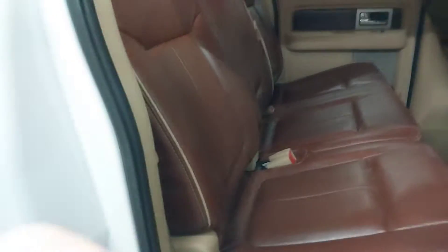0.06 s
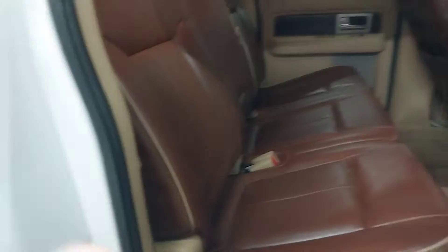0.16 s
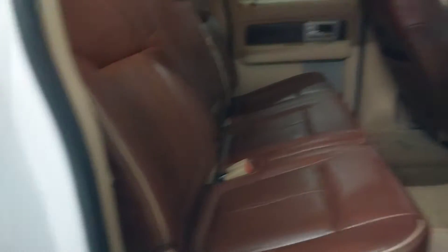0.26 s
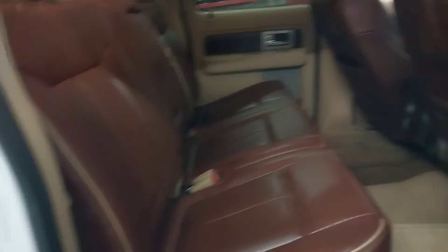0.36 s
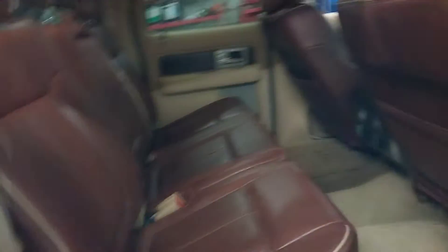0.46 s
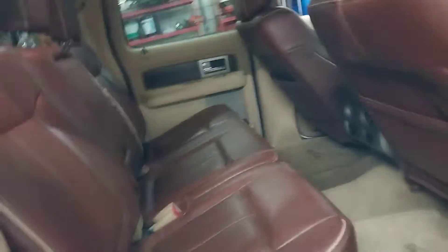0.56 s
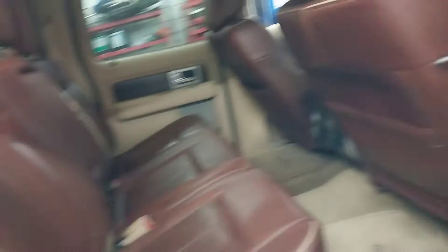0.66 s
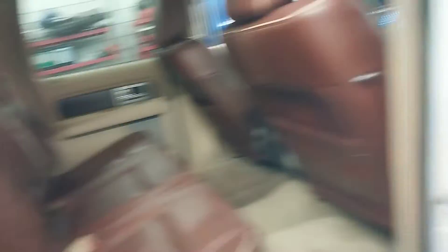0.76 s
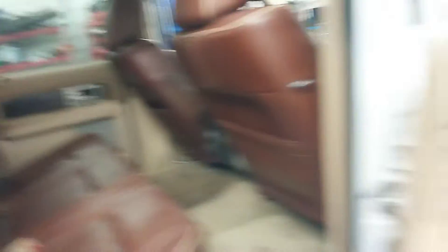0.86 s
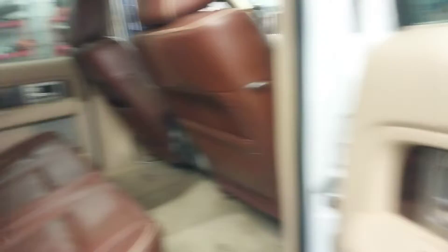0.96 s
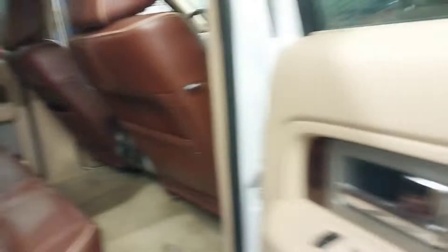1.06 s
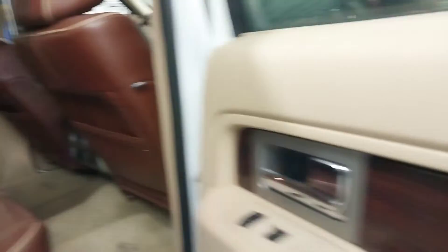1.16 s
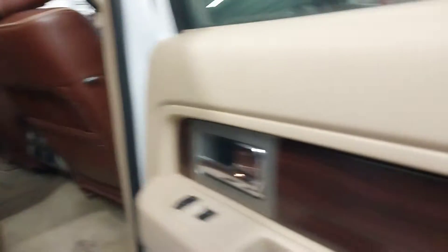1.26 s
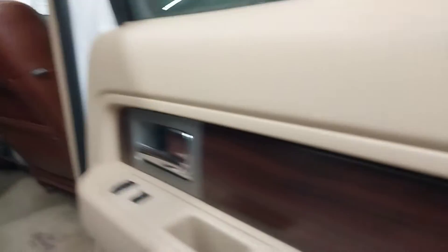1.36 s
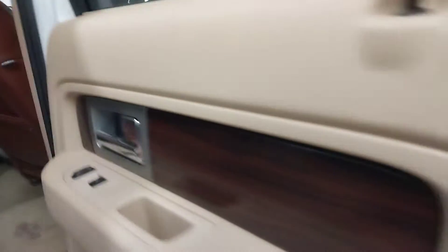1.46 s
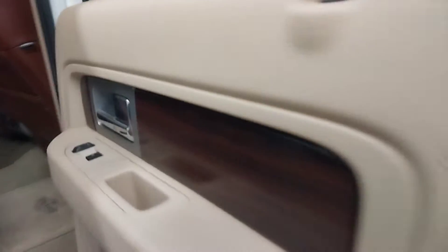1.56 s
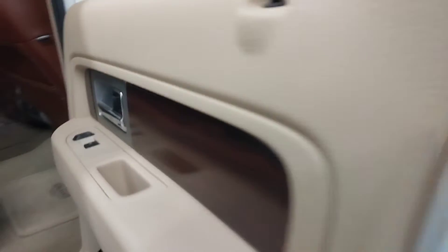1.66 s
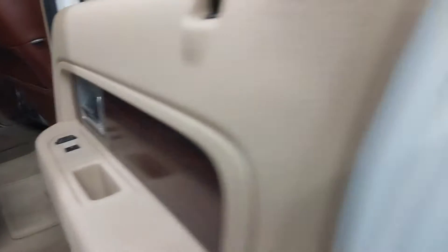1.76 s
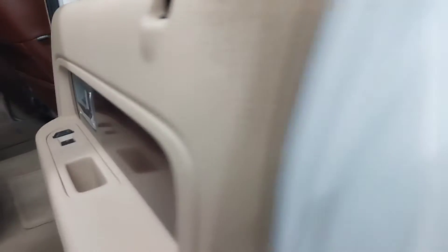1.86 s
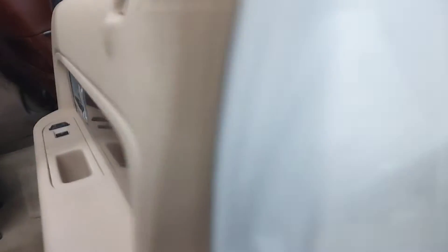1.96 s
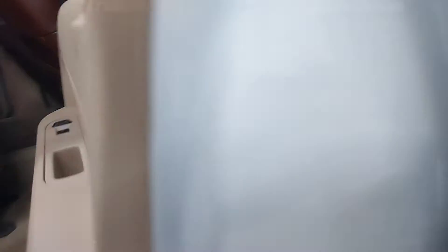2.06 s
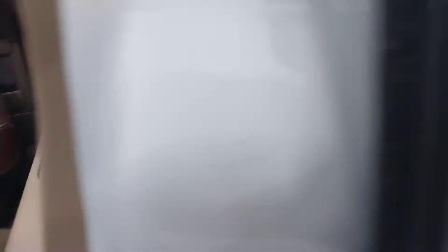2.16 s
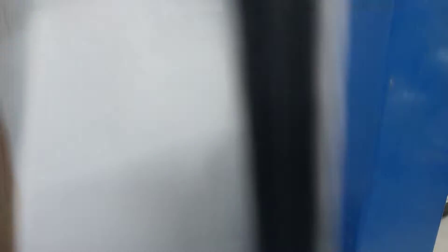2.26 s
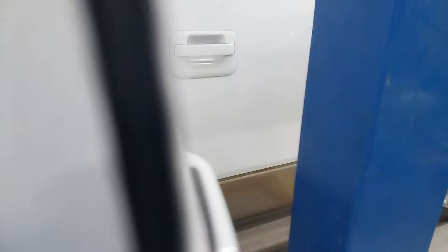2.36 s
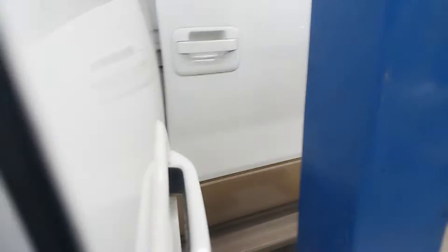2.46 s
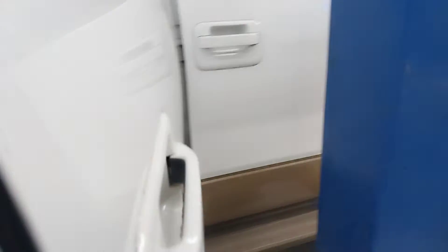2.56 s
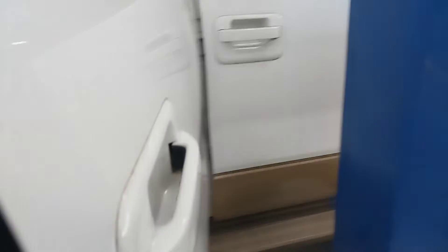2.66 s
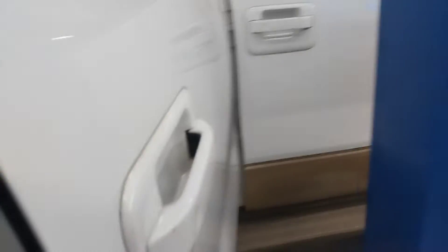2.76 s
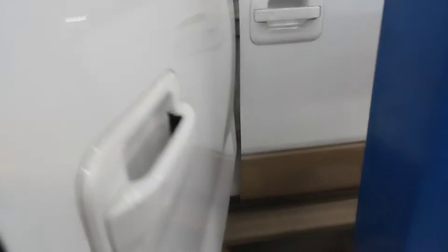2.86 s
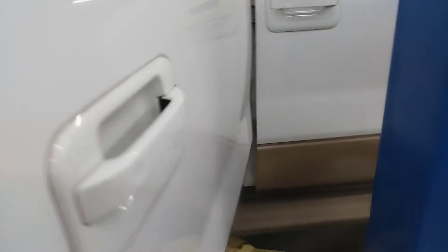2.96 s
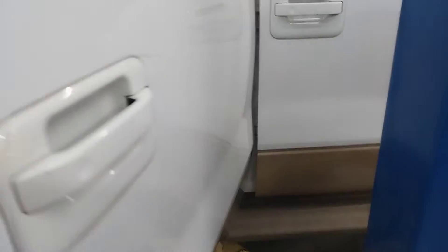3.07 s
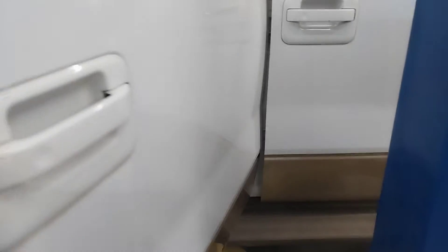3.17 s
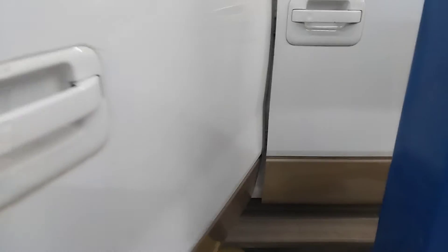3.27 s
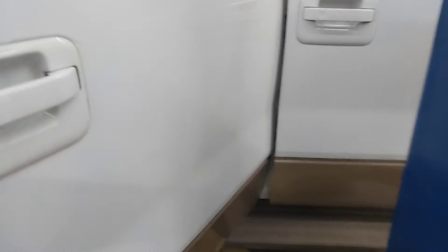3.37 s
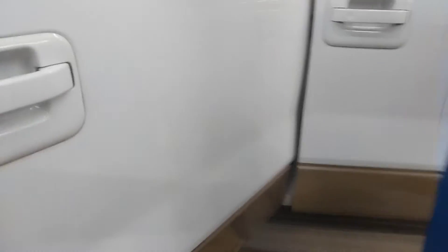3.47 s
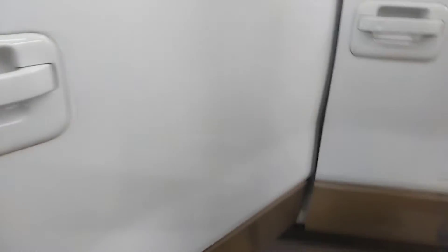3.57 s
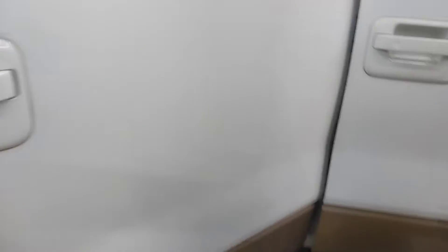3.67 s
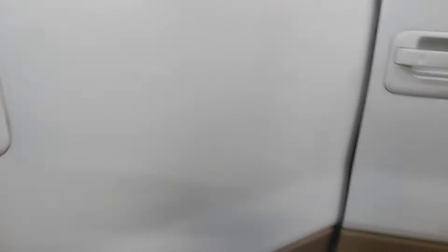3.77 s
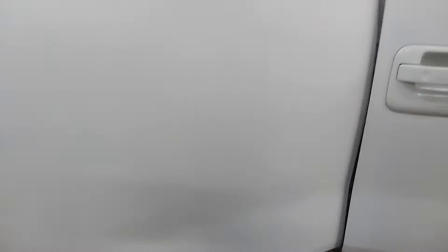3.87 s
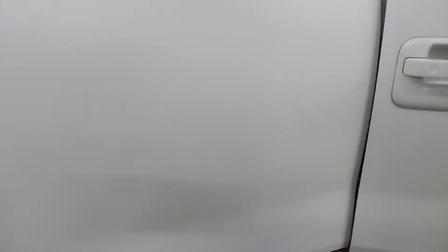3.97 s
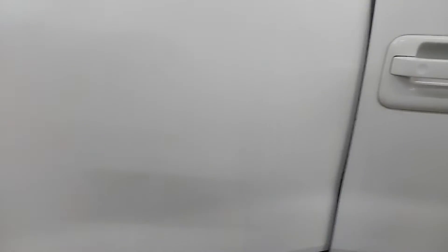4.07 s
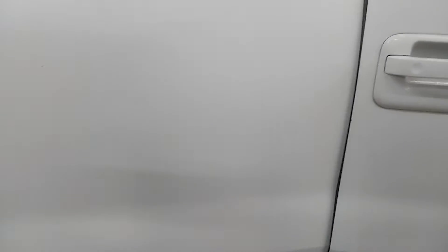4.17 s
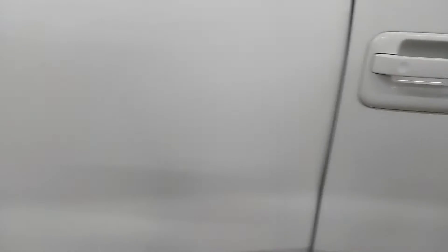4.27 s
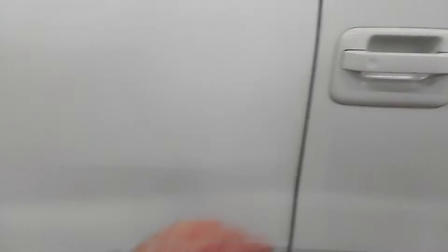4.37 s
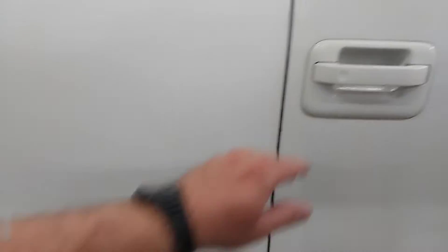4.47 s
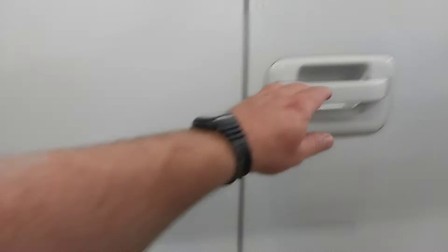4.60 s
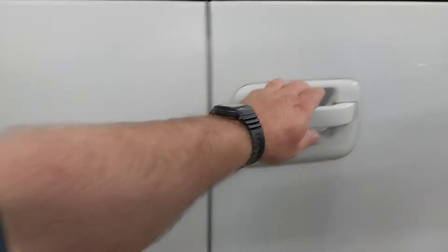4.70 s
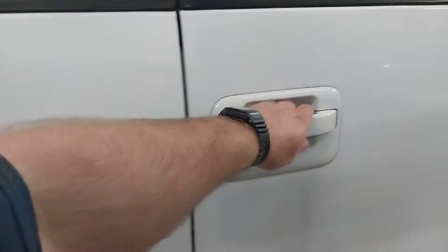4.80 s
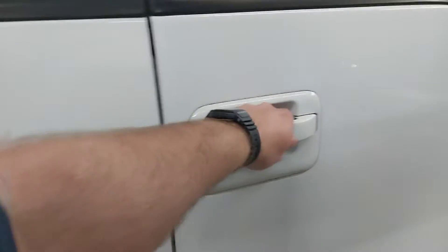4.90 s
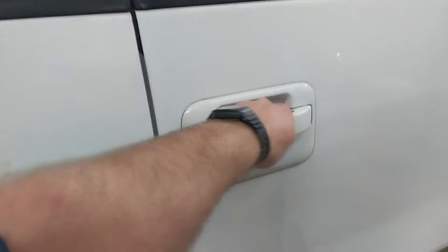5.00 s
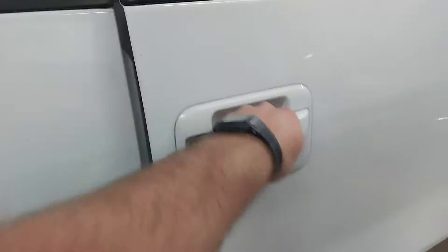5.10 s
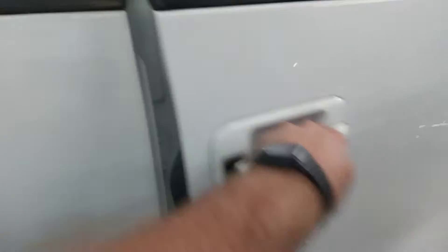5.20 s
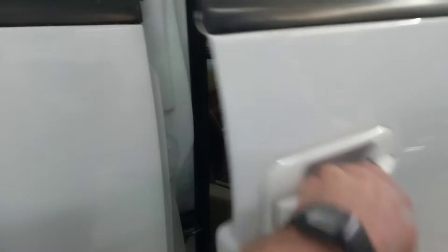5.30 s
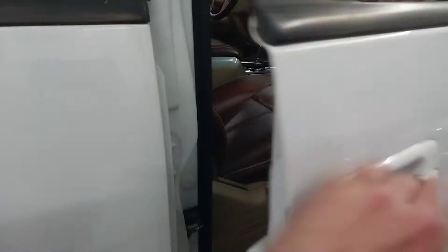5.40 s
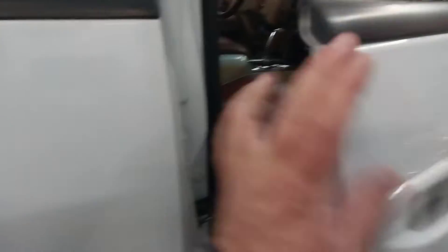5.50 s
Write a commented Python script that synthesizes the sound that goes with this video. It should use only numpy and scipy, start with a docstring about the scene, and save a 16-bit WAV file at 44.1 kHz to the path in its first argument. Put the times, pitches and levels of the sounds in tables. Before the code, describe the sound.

Soft footsteps over workshop ventilation, then a heavy pickup door slams and another door unlatches and swings open.

```python
"""Pickup doors in a workshop

Over the ventilation, someone steps round the open rear door with soft footfalls and sleeve rustle;
tools clatter further off. The door is slammed: it meets its seal, the latch snaps home, the panels
boom and the hall rings on. Then the front handle is pulled with a thin squeak, its latch pops and
that door swings open with a knock."""
import sys
import numpy as np
from scipy import signal
from scipy.fft import rfft, irfft, next_fast_len
from scipy.io import wavfile
from scipy.ndimage import uniform_filter1d

SR = 44100
rng = np.random.default_rng(int(sys.argv[2]) if len(sys.argv) > 2 else 0)


def dump(signal):
    """Clip the signal to [-1, 1] and save it as 16-bit WAV at the path in sys.argv[1]."""
    limited = np.clip(np.atleast_2d(signal).T, -1, 1)
    pcm = np.round(limited * 32767).astype(np.int16)
    wavfile.write(sys.argv[1], SR, pcm)


N = 244358
T = np.arange(N) / SR

# footfalls, finger bumps and the body of a knocked tool: (time [s], level [dB], pitch [Hz], decay [s], left-
# right [dB])
THUMPS = [(.1940, -40.5, 390, 0.032, -17), (0.341, -24, 209, 0.051, 2), (1.132, -24, 183, 0.017, -21),
          (1.136, -29.5, 503, 0.0068, -19), (1.178, -27, 149, 0.023, -22), (1.61, -37, 189, 0.067, 15),
          (2.007, -29.5, 188, 0.061, 1.5), (2.484, -30.5, 184, 0.031, -25.5),
          (2.4974, -17.5, 320, 0.0062, -19.5), (2.948, -36, 177, 0.027, -25),
          (2.9620, -33, 425, 0.0049, -34.5), (2.967, -35, 100, 0.024, -38.5),
          (3.6110, -34.5, 229, 0.036, -2), (4.177, -36.5, 236, 0.1, -2), (4.507, -36, 212, 0.076, -2)]


def from_db(db):
    """Decibels to gain."""
    return 10 ** (np.asarray(db) / 20)


def at_hz(points, hz):
    """Read a table on a log-frequency axis."""
    points_hz, value = np.transpose(points)
    return np.interp(np.log(np.maximum(hz, 1)), np.log(points_hz), value)


def pan(db):
    """Stereo gains for a left-right level difference."""
    return from_db(np.array([[.5], [-.5]]) * db)


def cut(x, hz, kind, order=2):
    """Butterworth filter."""
    return signal.sosfilt(signal.butter(order, hz, kind, fs=SR, output="sos"), x + 1e-18)


def add(out, start_s, sound):
    """Mix a sound in at start_s."""
    at = int(start_s * SR)
    out[..., at:at + sound.shape[-1]] += sound[..., :N - at]


def flutter(hz):
    """Low-passed random wobble, rms 1."""
    x = cut(rng.standard_normal(N + SR), hz, "low")[SR:]
    return x / x.std()


def noise(spectrum, size=N, tilt_db_per_oct=0):
    """Stereo noise, rms 1, alike on both sides in the bass; rolls off below the spectrum's first point."""
    # (frequency [Hz], left-right correlation)
    likeness = [(50, 0.89), (280, 0.94), (520, 0.73), (1100, 0.022), (3000, 0.033), (15000, 0.018)]
    # (frequency [Hz], left-right [dB])
    balance = [(60, -3), (300, -1.5), (550, -2.5), (1400, -5), (2600, -12), (4800, 2), (8000, -10),
               (13000, -6)]
    hz = np.fft.rfftfreq(size, 1 / SR) + 1
    mid, side = rfft(rng.standard_normal((2, size)))
    alike = np.clip(at_hz(likeness, hz), 0, 1)
    pair = np.sqrt(1 + alike) * mid + np.sqrt(1 - alike) * side * [[1], [-1]]
    roll_off = np.minimum(hz / spectrum[0][0], 1) ** 2
    gain = from_db(at_hz(spectrum, hz) + tilt_db_per_oct * np.log2(hz)) * roll_off
    x = irfft(pair * gain * pan(at_hz(balance, hz)), size)
    return x / x.std()


def steady(spectrum):
    """Scene-length noise."""
    return noise(spectrum, size=next_fast_len(N, True))[:, :N]


def strokes(rows, rise_s, fall_db_per_s):
    """Gain of overlapping strokes: each swells up to its time, holds and dies away."""
    power = np.zeros(N)
    for s, hold_s, db in rows:
        rise = np.clip(1 + (T - s) / rise_s, 0, 1)
        fall = from_db(db - fall_db_per_s * np.maximum(T - s - hold_s, 0))
        power += (rise * fall) ** 2
    return np.sqrt(power)


def smooth_spectrum(x, width_bins=61):
    """Evens out a noise burst's fine spectral peaks so its echo has no metallic ring."""
    bins = rfft(x)
    even = np.sqrt(np.abs(uniform_filter1d(np.abs(bins) ** 2, width_bins)))
    return irfft(even * np.exp(1j * np.angle(bins)), len(x))[:len(x) // 2]


def contacts(rows, spectrum, grain_db):
    """Hard contacts: grainy noise bursts that die fast; returns direct sound and hall feed."""
    out, feed, t = np.zeros((2, N)), np.zeros(N), T[:SR // 5]
    knots_s = t[::40]
    for s, db, rise_s, t60_s, tilt_db_per_oct, pan_db, send_db in rows:
        grain = from_db(grain_db * np.interp(t, knots_s, rng.standard_normal(len(knots_s))))
        envelope = np.minimum(t / rise_s, 1) * from_db(-60 * np.maximum(t - rise_s, 0) / t60_s)
        burst = from_db(db) * envelope * grain * noise(spectrum, len(t), tilt_db_per_oct)
        add(out, s, burst * pan(pan_db))
        add(feed, s, smooth_spectrum(burst.mean(0)) * from_db(send_db))
    return out, feed


def ventilation(step_round_s=(1.25, 3.19), whine_hz=1180, whine_width_hz=35):
    """Air rush with a faint resonance; the door comes to screen it and the whine is lost."""
    # beside the open cab: (frequency [Hz], density [dB])
    air_open = [(30, -16), (60, -2.5), (95, -2), (135, -7), (235, -5), (340, -21.5), (1170, -16.5),
                (2280, -24), (3600, -45.5), (6000, -47.5), (8400, -68), (10800, -46.5), (12500, -66),
                (16000, -73)]
    # behind the door: (frequency [Hz], density [dB])
    air_behind = [(15, -49), (25, -9), (61, -3), (92, 0), (141, -6.5), (277, -11.5), (373, -11), (427, -16),
                  (677, -20.5), (1160, -16), (2280, -24), (3620, -42.5), (8590, -58), (11000, -44),
                  (16000, -55)]
    waver = np.array([flutter(whine_width_hz), flutter(whine_width_hz)])
    whine = from_db(-55.5) * waver * np.sin(2 * np.pi * whine_hz * T)
    beside = from_db(-38.5) * steady(air_open) + whine
    behind = from_db(-42.5) * steady(air_behind)
    screened = np.interp(T, step_round_s, [0, 1])
    return np.sqrt(1 - screened) * beside + np.sqrt(screened) * behind


def far_hiss(level_db=-41, stop_s=0.17, fall_db_per_s=152):
    """A distant jet of noise that soon stops."""
    # (frequency [Hz], density [dB])
    jet = [(300, 5), (600, -9), (1300, -6), (1750, 9), (2300, -5), (4000, -5.5), (5200, -17), (8400, -31),
           (11000, -43), (15500, -42)]
    return from_db(level_db - fall_db_per_s * np.maximum(T - stop_s, 0)) * steady(jet)


def narrow_hiss():
    """Faint, brief patches of narrow hiss near 4 kHz."""
    # (time [s], hold [s], level [dB])
    patches = [(.62, 0.46, -69), (1.75, 0.093, -65), (2.68, 0.2, -67), (3.27, .1, -72), (3.54, 0.15, -66)]
    # (frequency [Hz], density [dB])
    hiss = [(3000, -30), (3950, -2), (4900, -19), (6500, -14), (8400, -28)]
    return strokes(patches, rise_s=0.08, fall_db_per_s=163) * steady(hiss)


def cab_rumble():
    """Low swells as the person moves by the cab."""
    # (time [s], hold [s], level [dB])
    swells = [(.24, 0.032, -41), (.68, 0.13, -33), (1.19, 0.18, -40), (3.95, .04, -42)]
    # (frequency [Hz], density [dB])
    cab_boom = [(55, -14), (85, -12.5), (99, -4), (118, -11), (170, -36), (600, -72)]
    return strokes(swells, rise_s=0.25, fall_db_per_s=37) * steady(cab_boom)


def sleeve(grain_db=1.0, grain_hz=52):
    """Cloth brushing close by."""
    # (time [s], hold [s], level [dB])
    brushes = [(0, 0.41, -61.5), (.66, .05, -63.5), (1.62, 0.13, -62), (2.08, 0.24, -56),
               (2.44, 0.075, -45), (2.70, 0.022, -47.5), (3.52, 0.016, -52), (3.99, 0.01, -60),
               (5.40, 0.064, -56.5)]
    # (frequency [Hz], density [dB])
    cloth = [(2500, -5.5), (4000, -17), (6500, -6.5), (8400, -17.5), (10500, -1), (13000, -8),
             (15500, -5.5)]
    grain = from_db(grain_db * flutter(grain_hz))
    return strokes(brushes, rise_s=0.054, fall_db_per_s=55) * grain * steady(cloth) * pan(1.1)


def shuffle(level_db=-45.5, follow=0.1):
    """A scuff trails each thump, slightly louder after a strong one."""
    # (frequency [Hz], density [dB])
    scuff = [(140, 1.5), (210, 0.5), (320, -2.5), (700, -25), (1500, -12), (6000, -113)]
    mean_db = np.mean([db for _, db, *_ in THUMPS])
    rows = [(s, 0, level_db + follow * (db - mean_db)) for s, db, *_ in THUMPS]
    return strokes(rows, rise_s=0.03, fall_db_per_s=37.5) * steady(scuff)


def thumps():
    """Footfalls, finger bumps and a knocked tool's body: dull pulses a few cycles long."""
    out, t = np.zeros((2, N)), T[:SR // 4]
    for s, db, hz, decay_s, pan_db in THUMPS:
        age = t * np.log(1000) / decay_s
        envelope = from_db(db) * age * np.exp(1 - age)
        add(out, s, envelope * np.sin(2 * np.pi * hz * t) * pan(pan_db))
    return out


def clatter():
    """Tools and small things knocked about, and fingers bumping close by."""
    # (time [s], level [dB], rise [s], t60 [s], tilt [dB/oct], left-right [dB], hall send [dB])
    knocks = [(.1950, -30.5, 0.002, 0.01, -3.5, 21, 6), (.2510, -40, 0.0096, 0.078, 0, 3, 1.5),
              (1.1350, -50.5, 0.0027, 0.021, 6, -18, 3), (1.1850, -59, .003, .03, 4, -14, -13),
              (1.6125, -38, 0.002, 0.016, -3.5, -10, -8), (2.4950, -27, 0.0042, 0.022, -6.5, -7, -14),
              (2.9600, -48, .001, 0.043, 7.5, -14, -13), (2.9680, -34.5, 0.0016, 0.089, -3.5, -8.5, -10),
              (4.1750, -39.5, 0.0051, 0.13, 0, -2, -2), (4.1850, -30, 0.016, 0.11, 0.9, 0, 1),
              (4.2695, -24.5, 0.00019, 0.0055, 5, 8, -4), (4.5110, -55.5, .001, 0.059, 12, -9, 3)]
    # (frequency [Hz], density [dB])
    tools = [(200, -1), (450, -0.5), (700, 8.5), (1050, -4), (1800, 1.5), (2600, -1), (3500, -6.5),
             (4400, -12.5), (6500, -10), (8400, -29.5), (10500, -13), (15500, -24.5)]
    return contacts(knocks, tools, grain_db=3.5)


def clangs():
    """A piece of metal further off is struck and rings on."""
    # (time [s], level [dB])
    strikes = [(4.176, -38), (4.198, -39.5)]
    # (frequency [Hz], level [dB], t60 [s])
    modes = [(673, 2, 0.25), (1680, -8, 0.22), (2050, -17, 0.31), (2470, -2, 0.18), (2900, -8, 0.42),
             (3140, -19.5, 0.78), (3600, -10.5, 0.2)]
    out, t = np.zeros(N), T[:SR // 2]
    ring = sum(from_db(db - 60 * t / t60_s) * np.sin(2 * np.pi * hz * t) for hz, db, t60_s in modes)
    for s, db in strikes:
        add(out, s, from_db(db) * ring)
    return out


def hinge():
    """Short rasps of the door hinge."""
    # (time [s], level [dB], rise [s], t60 [s], tilt [dB/oct], left-right [dB], hall send [dB])
    rasps = [(2.8150, -38, .012, 0.084, 0, -1, -1.5), (2.8800, -51, .004, 0.031, 0, 0, 1)]
    # (frequency [Hz], density [dB])
    spectrum = [(250, 7), (500, 12), (900, -12), (1800, -1), (2600, -1.5), (3400, 0), (4000, -19),
                (8400, -26), (15000, -32)]
    return contacts(rasps, spectrum, grain_db=2.5)


def handle_squeaks(waver_hz=80, scratch_db=7.0, crest=0.91):
    """Dry pivots sing high and unevenly, growing with the pull until they slip free."""
    # (time [s], length [s], start pitch [Hz], end pitch [Hz], level [dB])
    glides = [(4.86, .11, 14700, 14000, -66), (4.94, 0.2, 13500, 13600, -57)]
    out = np.zeros(N)
    for s, length_s, start_hz, end_hz, db in glides:
        hz = np.interp(T, [s, s + length_s], [start_hz, end_hz])
        pull = np.interp((T - s) / length_s, [0, crest, 1], [0, 1, 0])
        phase = 2 * np.pi * np.cumsum(hz + waver_hz * flutter(300)) / SR
        out += from_db(db + scratch_db * flutter(120)) * pull * np.sin(phase)
    return out * pan(-20)


def latches():
    """Steel latch and handle parts snap against each other."""
    # (time [s], level [dB], rise [s], t60 [s], tilt [dB/oct], left-right [dB], hall send [dB])
    snaps = [(4.6195, -28.5, 0.0039, 0.14, -6.5, -1, 0), (4.6335, -17.5, 0.0077, 0.059, -4.5, -0.5, 5.5),
             (4.6745, -20, 0.0049, 0.048, -2, 7, -4), (4.9400, -52.5, 0.00089, 0.027, 1, 3, 14),
             (5.0705, -27, 0.0021, 0.023, 4.5, -1, 3), (5.0860, -61, 0.00076, 0.0067, -6, 3, -12),
             (5.1085, -24, 0.00078, 0.012, 6, 1, -9), (5.1125, -19.5, 0.00058, 0.18, -8.5, 4, -3),
             (5.3850, -44.5, 0.0032, 0.065, -4, 6, -12), (5.4710, -26, 0.0026, 0.058, -6.5, 0, -4.5)]
    # (frequency [Hz], density [dB])
    steel = [(300, -14), (550, 0.5), (780, -5.5), (1080, -4.5), (1450, -6), (2600, -5), (3800, -12),
             (5500, -6.5), (8400, -21), (10500, -10), (15500, -14.5)]
    return contacts(snaps, steel, grain_db=3.5)


def rebounds(count=5, jitter=0.097, spread_oct=0.47, stifle_s=0.023, send_db=-5.5):
    """A door shudders as it latches or springs free: rows of nearly even, weakening blows."""
    # (time [s], first level [dB], period [s], loss per rebound [dB], mode centre [Hz])
    shudders = [(4.7084, -3, .027, 2.5, 150), (5.1300, -10, .021, 1.4, 121)]
    rows = []
    for s, db, period_s, loss_db, centre_hz in shudders:
        slip = jitter * rng.standard_normal(count)
        for k in range(count):
            at_s = s + period_s * (k + slip[k] * (k > 0))
            rows.append((at_s, db - loss_db * k, centre_hz, spread_oct, stifle_s, send_db))
    return rows


def doors(skin_hz=950, left_delay_s=0.00018, squeeze_s=0.0022):
    """Each blow rings the door modes near its centre; returns direct sound and hall feed."""
    # rear door onto its seal and latched, then front door released and swung open:
    # (time [s], level [dB], mode centre [Hz], spread [oct], stifle time [s], hall send [dB])
    blows = [(4.6177, 2.5, 328, 0.13, 0.02, -5), (4.6330, 8, 457, 0.13, 0.015, -1.5),
             (4.6360, 6.5, 225.4, 0.13, 0.026, -27), (4.644, -3.5, 88, 0.69, 0.046, 5.5),
             (4.6785, -1.5, 306, 1.1, 0.02, 1), (4.681, -17, 65.7, 0.52, 0.12, -4),
             (4.6865, -1.5, 680, 0.085, 0.018, -6), (5.076, -25, 258, 0.66, 0.033, 3),
             (5.11, 0.5, 214.4, 0.43, 0.01, -2), (5.1200, -14, 530, 0.71, 0.0088, 5),
             (5.4770, -19, 318, 0.32, 0.032, -4), (5.4913, -10.5, 270, 0.24, 0.019, -6),
             (5.512, -16, 331, 0.23, 0.044, 1)]
    # door skin, trim and cab air: (frequency [Hz], level [dB], t60 [s])
    modes = [(67.6, -8.5, 0.66), (101.2, -9.5, 0.37), (153, -10, 0.49), (198, -8.5, 0.19), (243, 0, 0.11),
             (312.7, -0.5, 0.086), (349, -17, 0.065), (435, -10, 0.11), (504, -10.5, 0.058),
             (556, -25, 0.18), (706, -17, 0.096), (705, -13.5, 0.043), (793, -12, 0.089)]
    out, feed, t = np.zeros(N), np.zeros(N), T[:SR // 2]
    hz, mode_db, t60_s = np.transpose(modes)
    rings = np.sin(2 * np.pi * hz[:, None] * t) * from_db(-60 * t / t60_s[:, None])
    for s, db, centre_hz, spread_oct, stifle_s, send_db in blows + rebounds():
        reach = np.exp(-.5 * (np.log2(hz / centre_hz) / spread_oct) ** 2)
        # the rubber first gives way, then grips the panel
        seal = (1 - np.exp(-t / squeeze_s)) * np.exp(-(t / stifle_s) ** 2)
        boom = (from_db(db + mode_db) * reach) @ rings * seal
        add(out, s, boom)
        add(feed, s, boom * from_db(send_db))
    out, feed = cut(np.array([out, feed]), skin_hz, "low", order=4)   # padded panels: little treble
    left = np.interp(T - left_delay_s, T, out)
    return np.array([left, out]) * pan(-0.98), feed


def hall(feed, build_s=0.016, early_db=8.5, early_s=0.05):
    """Diffuse echoes build up, peak while nearby walls answer, and die octave by octave."""
    # (frequency [Hz], t60 [s])
    decay = [(60, 0.63), (250, 0.74), (600, 1.01), (2500, 1.4), (6000, 1.4), (14000, 0.82)]
    # (frequency [Hz], level [dB])
    colour = [(40, -3), (120, 2.5), (250, -3.5), (500, -1), (1000, -2), (3000, -2), (6000, -2),
              (15000, -2.5)]
    t = T[:3 * SR // 2]
    bin_hz = np.fft.rfftfreq(len(t), 1 / SR)
    rest, response = noise([(20, 0), (20000, 0)], size=len(t)), 0
    for hz in 62.5 * 2 ** np.arange(9):
        band = irfft(rfft(rest) * (bin_hz < hz * np.sqrt(2)), len(t))
        response = response + band * from_db(at_hz(colour, hz) - 60 * t / at_hz(decay, hz))
        rest = rest - band
    build = 1 - np.exp(-(t / build_s) ** 2)
    early = from_db(early_db * np.exp(-t / early_s))
    return from_db(-36) * signal.fftconvolve(feed[None], response * build * early, axes=1)[:, :N]


def scene():
    """Direct sounds and their hall echoes over the background and the noises of moving about."""
    boom, boom_feed = doors()
    snaps, snap_feed = latches()
    tools, tool_feed = clatter()
    rasps, rasp_feed = hinge()
    steps, metal = thumps(), clangs()
    feed = boom_feed + snap_feed + tool_feed + rasp_feed
    echoes = hall(feed + from_db(-23) * steps.mean(0) + from_db(-15) * metal)
    direct = boom + snaps + tools + rasps + steps + metal * pan(-2) + handle_squeaks()
    background = ventilation() + far_hiss()
    movement = cab_rumble() + shuffle() + sleeve()
    return direct + echoes + background + movement + narrow_hiss()


def record(dry, low_hz=57.6, top_hz=15900):
    """Cut the deepest bass, round the peaks, cut the top."""
    rounded = 1.251 * np.tanh(cut(dry, low_hz, "high") / 1.38)
    return signal.sosfilt(signal.ellip(10, .1, 80, top_hz, fs=SR, output="sos"), rounded)


dry = scene()
out = record(dry)
dump(out)
```